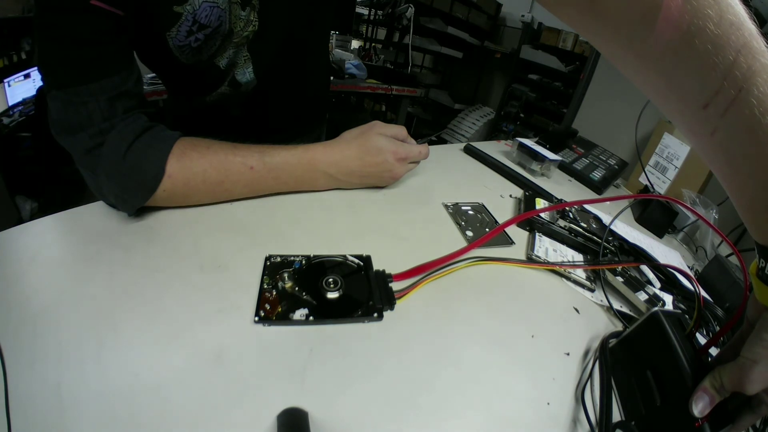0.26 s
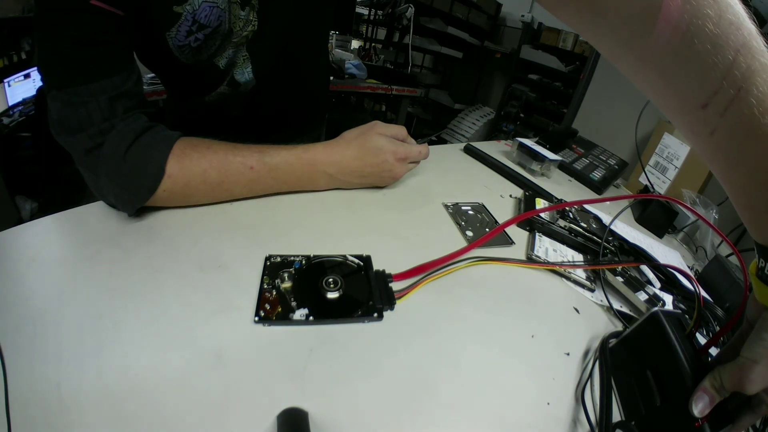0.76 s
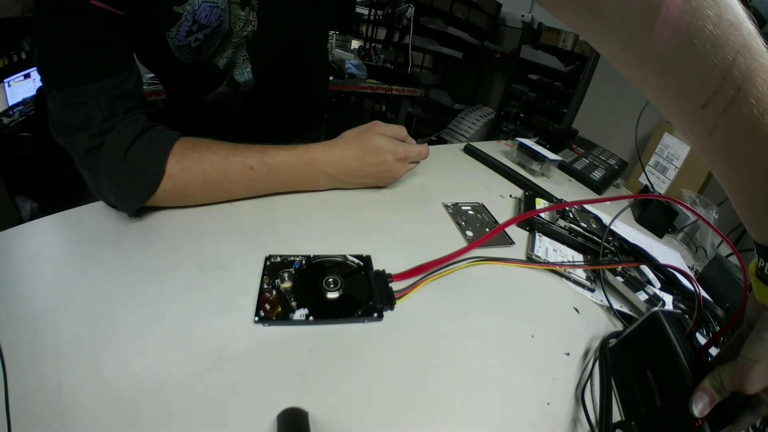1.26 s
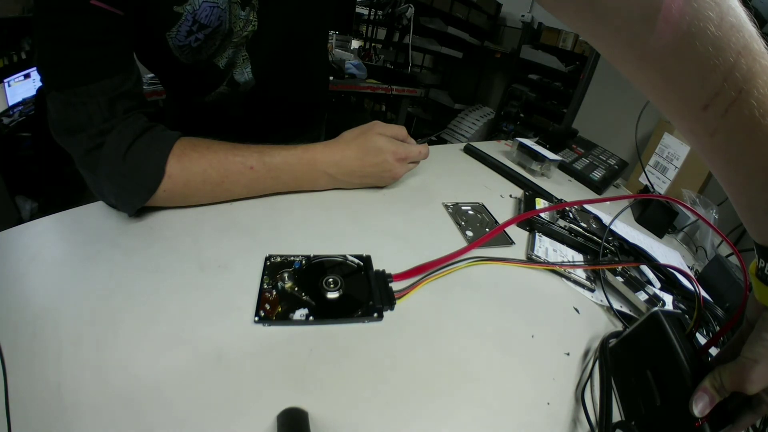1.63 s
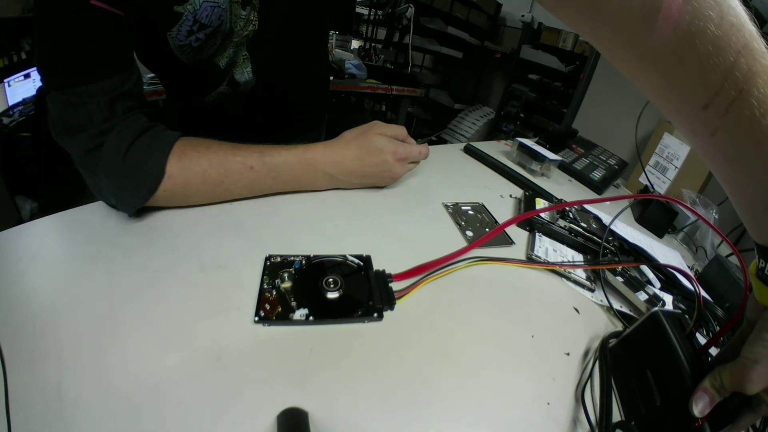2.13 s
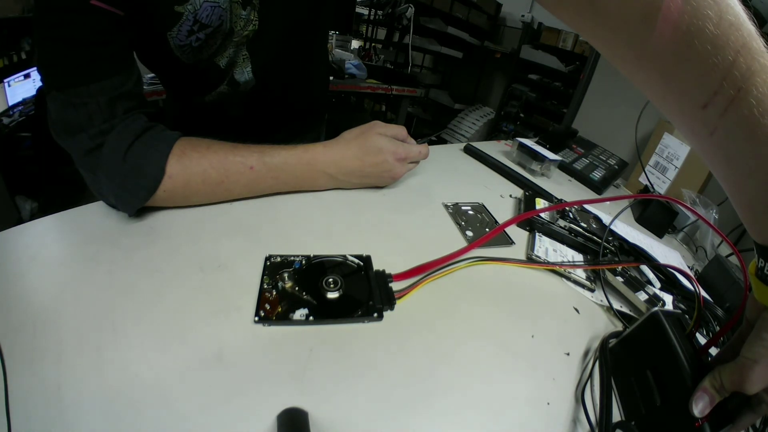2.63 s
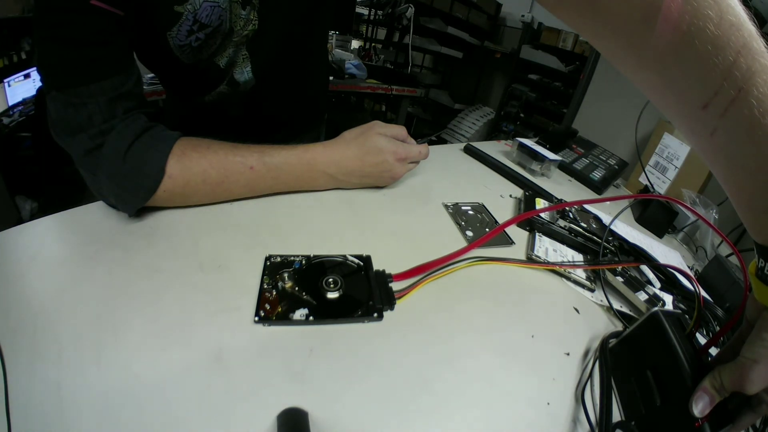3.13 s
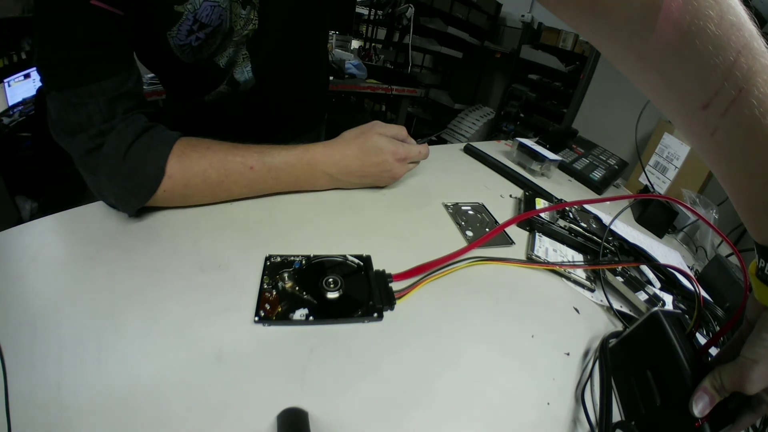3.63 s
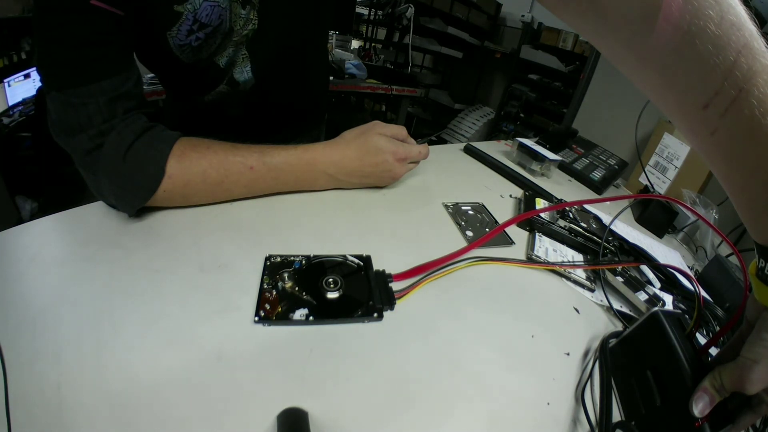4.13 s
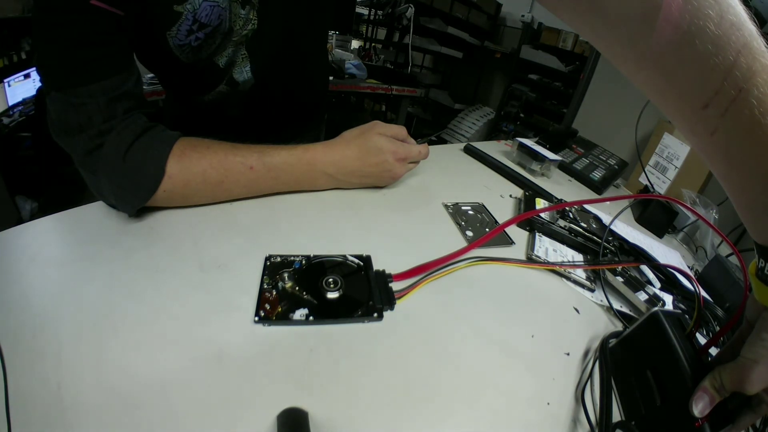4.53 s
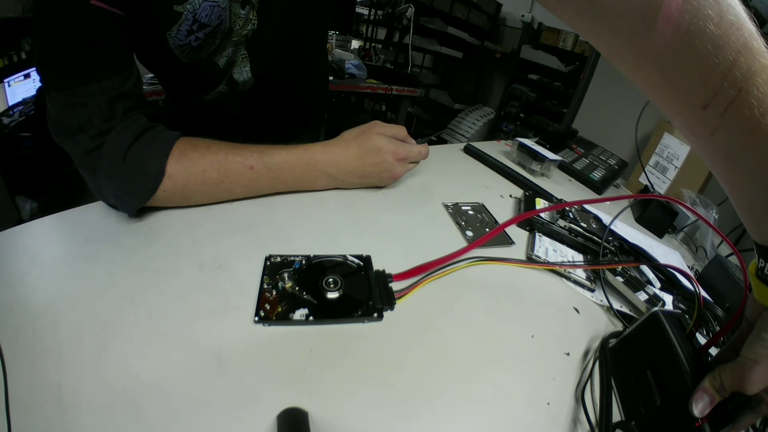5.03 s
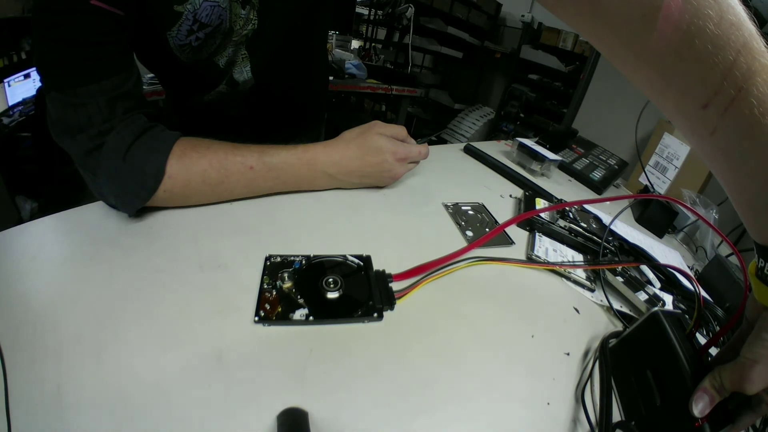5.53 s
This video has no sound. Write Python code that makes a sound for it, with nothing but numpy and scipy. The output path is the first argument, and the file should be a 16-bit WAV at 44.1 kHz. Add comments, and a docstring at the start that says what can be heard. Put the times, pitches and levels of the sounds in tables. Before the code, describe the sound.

An open hard drive clicks, ticks and sizzles irregularly over a steady high whine and low rumble in a small room.

```python
"""An opened, failing hard drive spins on a workbench in a small cluttered room.
From the start, fan and spindle whine over a low rumble and rushing air. At 0.15 s the servo begins to
hunt, sizzling and squealing; the head arm ticks in runs, one tick a revolution, then pings and clacks
against its stop at 0.6 s. A short hunt follows at 1.5 s, with clacks at 1.7 and 2.1 s.
From 2.4 s the hunting is almost unbroken; the arm hits its stop again at 3.4 and 5.7 s."""
import sys
import numpy as np
from scipy import signal
from scipy.io import wavfile
from scipy.ndimage import uniform_filter1d

SR = 44100
rng = np.random.default_rng(int(sys.argv[2]) if len(sys.argv) > 2 else 0)


def master(y):
    """Save y as 16-bit WAV."""
    cut = np.clip(np.atleast_2d(y).T, -1, 1)
    pcm = np.round(cut * 32767)  # scale
    wavfile.write(sys.argv[1], SR, pcm.astype(np.int16))


N = 254456
TIME = np.arange(N) / SR
FAN_HZ, SPINDLE_HZ = 408.35, 89.87


def from_db(db):
    """Decibels to gain."""
    return 10 ** (np.asarray(db) / 20)


def unit_rms(x):
    """Scale to rms 1."""
    return x / np.sqrt(np.mean(x ** 2) + 1e-20)


def at_hz(curve, hz):
    """Read a curve on a log-frequency axis."""
    freqs_hz, values = np.array(curve).T
    return np.interp(np.log(hz), np.log(freqs_hz), values)


def cut(x, hz, kind, order=2):
    """Butterworth filter."""
    return signal.sosfilt(signal.butter(order, np.clip(hz, 10, .49 * SR), kind, fs=SR, output="sos"), x)


def drift(rate_hz):
    """Slow random wander, rms 1."""
    hop, warmup = 40, 2000
    r = np.exp(-2 * np.pi * rate_hz * hop / SR)
    slow = signal.lfilter([1], [1, -2 * r, r * r], rng.standard_normal(N // hop + warmup + 2))[warmup:]
    return np.interp(np.arange(N) / hop, np.arange(len(slow)), unit_rms(slow))


def narrow_noise(hz, width_hz):
    """Narrow noise band, rms 1."""
    phase = 2 * np.pi * hz * TIME
    return drift(width_hz) * np.cos(phase) + drift(width_hz) * np.sin(phase)


def poles(hz, width_hz):
    """Denominator of one resonance."""
    r = np.exp(-np.pi * width_hz / SR)
    return [1, -2 * r * np.cos(2 * np.pi * hz / SR), r * r]


def resonate(x, hz, width_hz):
    """One resonance, peak gain 1."""
    a = poles(hz, width_hz)
    return (1 - a[2]) / 2 * signal.lfilter([1, 0, -1], a, x)


def body(force, modes):
    """Parallel resonances, signs alternating."""
    impulse = signal.unit_impulse(SR // 16)
    response = sum((-1) ** k * from_db(db) * resonate(impulse, hz, width_hz)
                   for k, (hz, width_hz, db) in enumerate(modes))
    return signal.oaconvolve(force, response)[:N]


def blow(low_hz, high_hz, count):
    """Bending waves disperse in metal: random allpasses smear an impulse over a few ms."""
    step_hz = (high_hz - low_hz) / count
    sections = [poles(low_hz + step_hz * (k + u), step_hz) for k, u in enumerate(rng.random(count))]
    return signal.sosfilt([a[::-1] + a for a in sections], signal.unit_impulse(SR // 100))


def add(track, start_s, db, pulse):
    """Mix a pulse into a track."""
    start = int(start_s * SR)
    track[start:start + len(pulse)] += from_db(db) * pulse[:N - start]


def whine(hz, partials, wander, waver_db):
    """Partials of a rotor whose speed wanders slightly."""
    angle = 2 * np.pi * np.cumsum(hz * (1 + wander * drift(2.43))) / SR
    out = 0
    for multiple, db in partials:
        amplitude = np.sqrt(2) * from_db(db + waver_db * drift(36))
        out += amplitude * np.sin(multiple * angle + rng.uniform(0, 2 * np.pi))
    return out


# fan partials: multiple, level_db
FAN_PARTIALS = [(1, -70), (4, -57), (5, -67.5), (6, -70), (7, -74), (9, -75), (10, -81.5), (11, -73)]


def fan():
    """The cooling fan whines at a near-constant speed."""
    return whine(FAN_HZ, FAN_PARTIALS, wander=0.00053, waver_db=1.56)


# spindle partials: multiple, level_db
SPINDLE_PARTIALS = [(15, -60), (26, -72.5)]


def spindle():
    """The spindle whines at high multiples of its rotation rate."""
    return whine(SPINDLE_HZ, SPINDLE_PARTIALS, wander=0.00131, waver_db=1.5)


# low drones: pitch_hz, width_hz, rms_db
DRONE_BANDS = [(38.4, 8.4, -49.5), (111.6, 5.8, -50.5), (122.4, 5.9, -52.5), (206.5, 9.5, -63.5),
               (287, 25.4, -60), (333, 3.6, -73), (513, 7.8, -69)]


def drones():
    """A low hum rumbles in narrow bands of noise."""
    return sum(from_db(db) * narrow_noise(hz, width_hz) for hz, width_hz, db in DRONE_BANDS)


# air spectrum: freq_hz, relative_density_db
AIR_SPECTRUM = [(20, 0), (40, -2), (62, 6), (100, -2.5), (160, -4), (270, -9.5), (400, -16.5), (700, -20.5),
                (1700, -21.5), (3500, -27), (7500, -38), (12000, -41), (13500, -43), (16000, -58)]
# left-right likeness of the air: freq_hz, correlation
AIR_CORRELATION = [(30, .99), (130, 1), (290, 0.94), (640, 0.75), (1410, 0.6), (3100, 0), (15000, 0)]


def air(patchy_db=-0.5):
    """Rush of fan and platters in half-octave bands, alike left and right only in the bass; rms 1."""
    out, edges_hz = 0, 22 * 2 ** np.arange(0, 9.6, .5)
    white = rng.standard_normal((2, 2, N))
    for k, (low_hz, high_hz) in enumerate(zip(edges_hz, edges_hz[1:])):
        mid, side = cut(white[k % 2], [low_hz, high_hz], "band")
        centre_hz = np.sqrt(low_hz * high_hz)
        alike = at_hz(AIR_CORRELATION, centre_hz)
        band = np.sqrt(1 + alike) * mid + np.sqrt(1 - alike) * side * [[1], [-1]]
        out += from_db(at_hz(AIR_SPECTRUM, centre_hz) + patchy_db * drift(12)) * band
    return unit_rms(out)


# hunts for a track: start_s, end_s, start_effort_db, end_effort_db
TRACK_HUNTS = [(0.148, 0.593, -64.5, -63.5), (1.504, 1.746, -71, -61), (2.39, 2.755, -65, -66),
               (2.76, 5.7, -66, -69)]


def servo_effort(attack_s=0.018, release_s=0.028):
    """Effort sets in with each hunt, ramps through it and dies away."""
    effort = np.zeros(N)
    for start_s, end_s, start_db, end_db in TRACK_HUNTS:
        ramp = from_db(np.interp(TIME, [start_s, end_s], [start_db, end_db]))
        attack = np.clip((TIME - start_s) / attack_s, 0, 1)
        release = np.exp(-np.maximum(TIME - end_s, 0) / release_s)
        effort = np.maximum(effort, ramp * attack * release)
    return effort


def gate(spans_s):
    """1 inside the spans, 0 outside, 10 ms edges."""
    inside = np.any([(TIME >= start_s) & (TIME < end_s) for start_s, end_s in spans_s], axis=0)
    return uniform_filter1d(inside.astype(float), SR // 100)


# head suspension resonances: pitch_hz, width_hz, gain_db
SUSPENSION_MODES = [(3950, 400, -2), (6700, 1500, -11), (8100, 900, -9), (10150, 700, -5), (10850, 350, -2),
                    (12900, 700, -6), (14350, 450, -2), (15600, 350, -3)]


def servo(flutter_db=2.0, runout_db=4.0, whistle_db=2.5, squeal_db=-54,
          hiss_db=2, seek_boost_db=10, squeal_boost_db=5):
    """The hunting suspension squeals before a run and sizzles during it, swelling once a revolution."""
    effort = servo_effort()
    seeking = gate([(start_s, start_s + count / SPINDLE_HZ) for start_s, count, _, _ in SEEK_RUNS])
    squealing = gate([(start_s - squeal_s, start_s) for start_s, _, _, squeal_s in SEEK_RUNS])
    swell = from_db(flutter_db * drift(23) + runout_db * np.sin(2 * np.pi * SPINDLE_HZ * TIME))
    whistle_gain = np.maximum(effort * from_db(whistle_db), squealing * from_db(squeal_db))
    whistle = whistle_gain * narrow_noise(hz=11820, width_hz=100)
    jitter = cut(cut(rng.standard_normal(N), 6500, "high", order=1), 13000, "low")
    quiver = unit_rms(body(jitter, SUSPENSION_MODES))
    hiss = effort * from_db(hiss_db + seek_boost_db * seeking + squeal_boost_db * squealing) * quiver
    return swell * (whistle + hiss)


# runs of head seeks: start_s, tick_count, level_db, squeal_before_s
SEEK_RUNS = [(0.224, 3, -34.5, .03), (0.312, 1, -38, 0.0078), (0.369, 3, -33.5, 0.015),
             (0.447, 1, -28.5, 0.031), (0.5113, 1, -34, 0.015), (0.5736, 1, -31, 0.019), (1.725, 1, -33, 0),
             (2.4168, 1, -33, 0.0029), (2.439, 1, -33, 0), (2.478, 5, -35, 0.053), (2.59, 1, -31, 0.081),
             (2.657, 2, -31, 0.029), (2.7314, 3, -33, .04), (2.9165, 1, -24, 0.041),
             (2.9881, 3, -33.5, 0.006), (3.0864, 1, -26.5, 0.052), (3.1027, 1, -24.5, 0),
             (3.1936, 1, -25, 0.037), (3.261, 1, -37, 0.036), (3.289, 1, -28, 0.0094), (3.302, 5, -43.5, 0),
             (3.3626, 1, -23, 0.0053), (3.468, 1, -29.5, 0.036), (3.539, 1, -27, .045),
             (3.545, 2, -23.5, 0), (3.569, 4, -21.5, 0), (3.614, 2, -24.5, 0), (3.646, 2, -32, 0),
             (3.668, 3, -23, 0.014), (3.714, 1, -25, 0.0043), (3.765, 1, -35.5, 0.03),
             (3.8371, 1, -24, 0.033), (3.8593, 4, -22, 0), (3.915, 1, -24.5, 0.0034),
             (3.9376, 3, -24.5, 0.003), (4.0434, 1, -34, 0.029), (4.125, 2, -23.5, 0.055),
             (4.1882, 1, -39, 0.019), (4.2475, 1, -31, .04), (4.2692, 1, -25.5, 0),
             (4.501, 1, -40.5, 0.025), (4.5348, 2, -31, 0.015), (4.579, 5, -31, 0.017),
             (4.69, 1, -31.5, 0.055), (4.7242, 5, -24, 0.0041), (4.781, 3, -22.5, 0), (4.825, 1, -32, 0),
             (4.8463, 1, -32, 0), (4.902, 1, -37, 0.031), (4.9585, 1, -28, .035),
             (4.9805, 2, -25.5, 0.0082), (5.026, 1, -23.5, 0.011), (5.119, 1, -43.5, 0.041),
             (5.3978, 1, -44, 0.033), (5.461, 1, -57, 0.045), (5.659, 2, -33.5, 0.051)]


def seek_ticks(arch_db=3.5, uneven_db=1.3, stray_chance=0.05, stray_db=-48):
    """Ticks as (start_s, level_db): one a revolution in runs that arch in level, plus strays in hunts."""
    ticks = []
    for start_s, count, db, _ in SEEK_RUNS:
        turns = np.arange(count)
        accent_db = arch_db * np.sin(np.pi * (turns + .5) / count)
        accent_db += uneven_db * rng.standard_normal(len(turns))
        ticks += zip(start_s + turns / SPINDLE_HZ, db + accent_db - accent_db.mean())
    turns_s = np.arange(0, N / SR, 1 / SPINDLE_HZ)
    for stray_s in turns_s[rng.random(len(turns_s)) < stray_chance]:
        if any(start_s < stray_s < end_s for start_s, end_s, _, _ in TRACK_HUNTS):
            ticks.append((stray_s, stray_db))
    return ticks


# head arm resonances: pitch_hz, width_hz, gain_db
ARM_MODES = [(3751, 207, -4.3), (3989, 181, 3.1), (4141, 367, -5.8), (4526, 97, -7.3), (4778, 150, -5.2),
             (5667, 159, -14.4), (5983, 201, -15.4), (6646, 224, -8.0), (6884, 321, -9.3),
             (7954, 146, -7.2), (8170, 130, -6.9), (8678, 769, -17.3), (9408, 513, -13.8),
             (10036, 338, -16.7), (10687, 404, -11.7), (10983, 1003, -14.9), (12708, 979, -25.2),
             (14616, 1296, -31.5)]


def seeks(brake_db=-3.5, settle_db=-11.5, travel_s=.0009, scratch_db=-36, scratch_t60_s=0.043):
    """The voice coil kicks and brakes the arm, which settles scratchily; jump time colours each tick."""
    force, t, ticks = np.zeros(N), TIME[:SR // 25], seek_ticks()
    gaps_s = travel_s * rng.uniform(0.55, 1.6, (len(ticks), 2))
    for (start_s, db), (jump_s, settle_s) in zip(ticks, gaps_s):
        add(force, start_s, db, blow(2705, 15130, count=11))
        add(force, start_s + jump_s, db + brake_db, -blow(2935, 15040, count=11))
        add(force, start_s + jump_s + settle_s, db + settle_db, blow(2420, 16940, count=11))
        scratch = rng.standard_normal(len(t)) * from_db(-60 * t / scratch_t60_s)
        add(force, start_s, db + scratch_db, scratch)
    arm = cut(body(force, ARM_MODES), 2140, "high", order=3)
    return from_db(25) * arm + from_db(8) * casting(force)


# drive casting resonances: pitch_hz, width_hz, gain_db
CASTING_MODES = [(1980, 80, -7.0), (2295, 116, -8.9), (2462, 140, -3.3), (2628, 237, -7.3),
                 (3074, 189, -4.5), (3306, 295, -8.0), (3761, 104, 0.2), (4015, 216, -2.8),
                 (4407, 115, -5.7), (4750, 234, -9.4), (5186, 184, -9.1), (5601, 229, -7.4),
                 (6293, 558, -13.8), (7055, 639, -16.2), (8157, 397, -11.6), (9032, 318, -11.8),
                 (10175, 511, -9.2), (10717, 715, -11.8), (11487, 162, -13.2), (11889, 272, -13.0),
                 (12780, 1069, -19.1), (13698, 233, -16.4), (14325, 419, -24.9), (15593, 170, -30.3)]


def casting(force):
    """The drive's casting rings under the arm's blows."""
    return body(force, CASTING_MODES)


# light touches of the arm: start_s, pitch_hz, level_db
ARM_TOUCHES = [(0.5907, 2900, -20.5), (1.223, 4600, -40), (1.774, 2930, -38), (5.6847, 2950, -25)]


def pings(width_hz=110):
    """A glancing touch rings one mode, and the casting faintly."""
    rings, force = np.zeros((2, N))
    t = TIME[:SR // 20]
    for start_s, hz, db in ARM_TOUCHES:
        add(rings, start_s, db, np.exp(-np.pi * width_hz * t) * np.sin(2 * np.pi * hz * t))
        add(force, start_s, db, blow(2900, 14400, count=11))
    return from_db(-7) * rings + from_db(25) * cut(casting(force), 4000, "high", order=1)


# bench top resonances: pitch_hz, width_hz, gain_db
BENCH_MODES = [(520, 60, -11), (690, 80, -6), (900, 90, -3), (1000, 90, -2), (1170, 80, -3), (1290, 45, 5),
               (1560, 70, -8), (1830, 80, -6), (2013, 35, 7), (2500, 55, 5)]
# arm hits on the stop: start_s, level_db, treble_offset_db, knock_offset_db, ring_offset_db
STOP_HITS = [(0.593, -21, -6, 1, 2.5), (0.6132, -16.5, -2, -2, -0.5), (0.625, -37, -4.0, 8, -0.5),
             (1.7386, -32, 0, 8.5, -25), (2.0905, -17, -7.5, -1.5, 0.5), (2.0983, -26.5, 0, 3, 0),
             (3.387, -15.5, 2, 0.5, -0.5), (3.4059, -21.5, 3, 3.5, -13), (5.688, -20, -5.5, -1, -1),
             (5.7078, -16.5, -4.5, -1.5, 1), (5.7175, -31, -9, -6, -2)]


def clacks(bench_lag_s=0.001973):
    """The arm hits its stop: the casting cracks at once, the bench answers later and lower."""
    on_casting, on_bench = np.zeros((2, N))
    for start_s, db, treble_db, knock_db, ring_db in STOP_HITS:
        pulse = blow(1145, 16700, count=16)
        # harder contact is brighter; an arm held on the stop rings less
        pulse += (from_db(treble_db) - 1) * cut(pulse, 5600, "high", order=1)
        pulse += (from_db(ring_db) - 1) * resonate(pulse, hz=3900, width_hz=900)
        add(on_casting, start_s, db, pulse)
        # only heavy blows reach the lowest bench modes
        lowest_hz = np.clip(850 - 300 * (db + 17), 350, 950)
        thump = cut(blow(554, 2673, count=7), lowest_hz, "high")
        add(on_bench, start_s + bench_lag_s, db + knock_db, thump)
    crack = cut(casting(on_casting), 820, "high")
    knock = cut(body(on_bench, BENCH_MODES), 360, "high")
    return from_db(37.5) * crack + from_db(25) * knock


def scatter(t60_s, gap_s, top_hz):
    """Dense reflections, different at each microphone port, unit energy."""
    t = TIME[:SR // 4]
    noise = cut(rng.standard_normal((2, len(t))), top_hz, "low", order=1)
    tail = noise * from_db(-60 * t / t60_s) * (t > gap_s)
    return tail / np.sqrt(np.sum(tail ** 2) / 2)


# echoes off nearby surfaces: delay_s, gain_db
SURFACE_ECHOES = [(.0046, -7), (0.01, -15), (0.0277, -24.5), (.0375, -38)]


def room(x):
    """Reflections: bench clutter, a few dull echoes, a short faint tail."""
    echoes = np.zeros((2, SR // 4))
    for delay_s, db in SURFACE_ECHOES:
        arrivals_s = delay_s + rng.normal(0, .0002, 2)
        echoes[[0, 1], (SR * arrivals_s).astype(int)] = from_db(db)
    clutter = from_db(-10) * scatter(t60_s=.03, gap_s=.0005, top_hz=11000)
    tail = from_db(-23) * scatter(t60_s=0.17, gap_s=0.013, top_hz=7000)
    response = cut(echoes, 8300, "low", order=1) + clutter + tail
    return signal.oaconvolve(x[None], response, axes=1)[:, :N]


def two_ports(x, lead_ms, left_db):
    """The nearer, left microphone port leads; left_db is its level against the right."""
    taps = np.arange(-16, 17) - lead_ms / 1000 * SR
    delayed = np.convolve(x, np.sinc(taps) * np.sinc(taps / 20), "same")
    return np.array([x * from_db(left_db / 2), delayed * from_db(-left_db / 2)])


def scene():
    """The drive close by, the treble of its knocks beamed left, over the steady machinery."""
    knocks, ticks, sizzle = clacks() + pings(), seeks(), servo()
    beam = from_db(-13) * cut(knocks, 10000, "high", order=1) * [[1], [-1]]
    arm = two_ports(knocks + ticks, lead_ms=0.027, left_db=1.7) + beam
    suspension = two_ports(sizzle, lead_ms=0.028, left_db=-4)
    rotors = two_ports(fan() + spindle(), lead_ms=0.095, left_db=-4)
    steady = rotors + drones() + from_db(-46.5) * air()
    return steady + suspension + arm + room(knocks + ticks + sizzle)


def record(dry, cutoff_hz=15900):
    """Steep low-pass."""
    return signal.sosfilt(signal.ellip(10, .1, 80, cutoff_hz, fs=SR, output="sos"), dry)


dry = scene()
out = record(dry)
master(out)
```